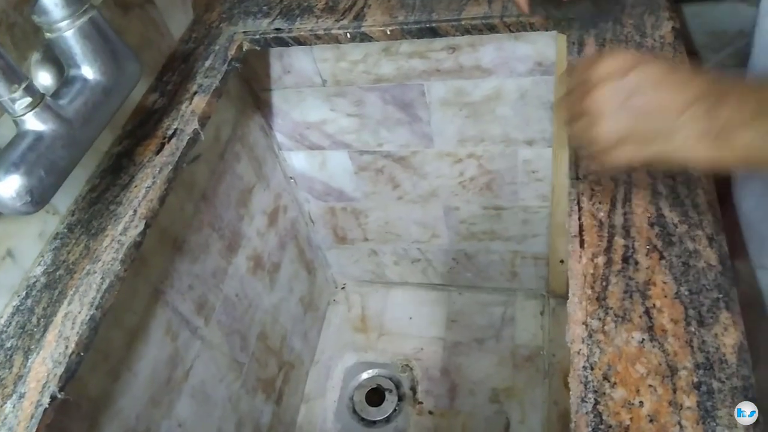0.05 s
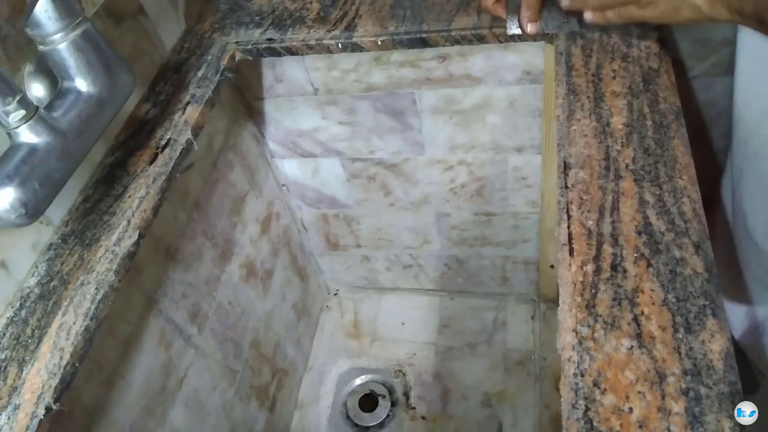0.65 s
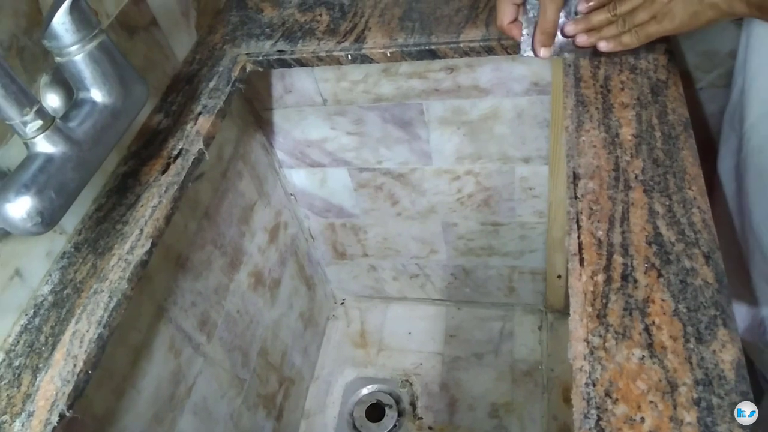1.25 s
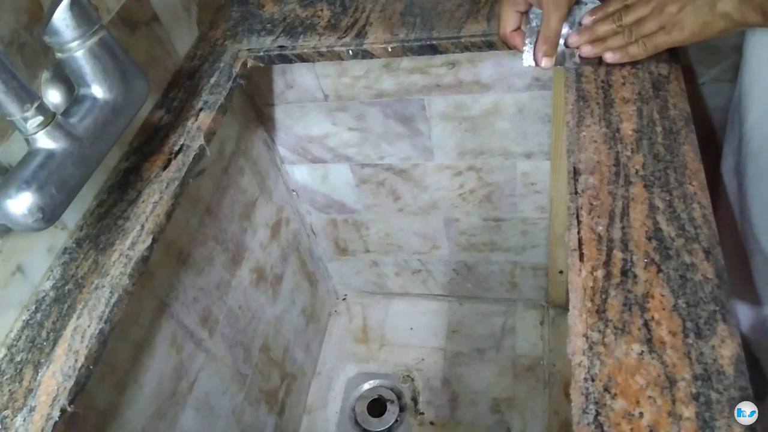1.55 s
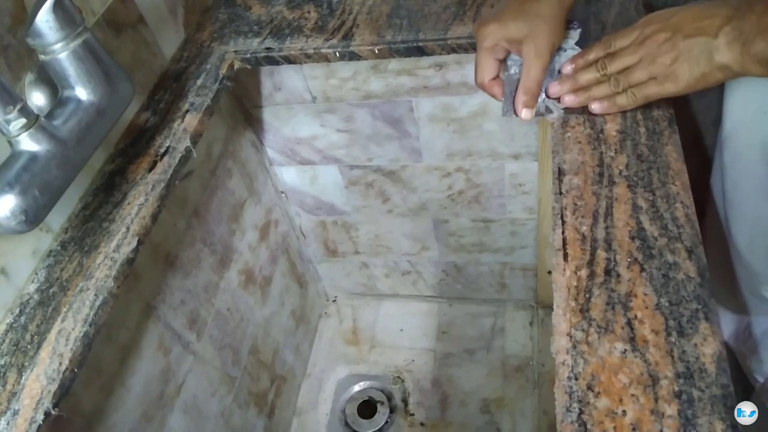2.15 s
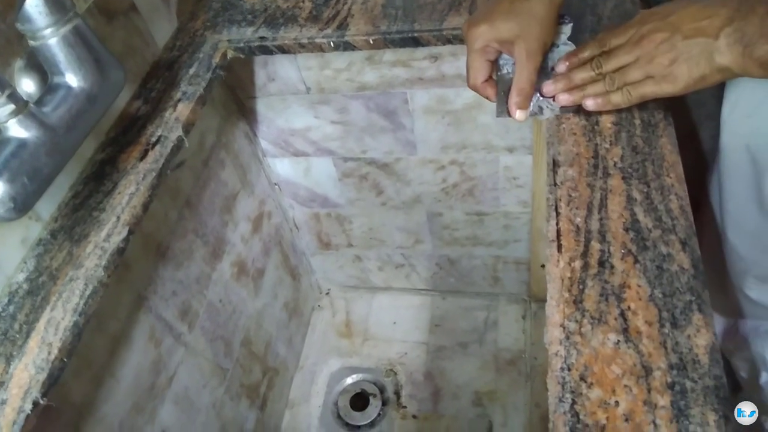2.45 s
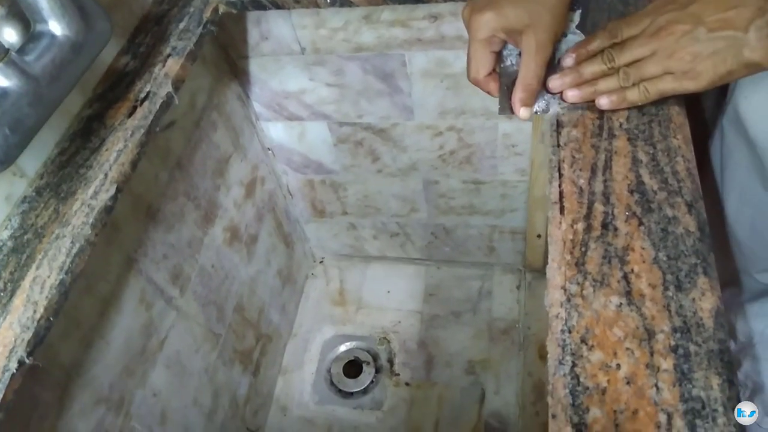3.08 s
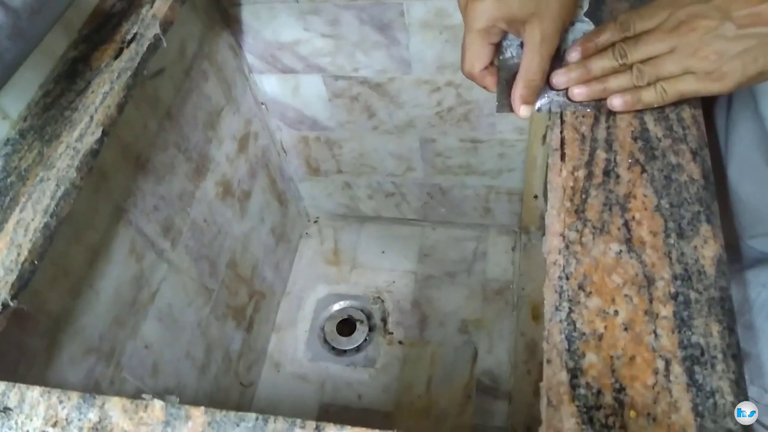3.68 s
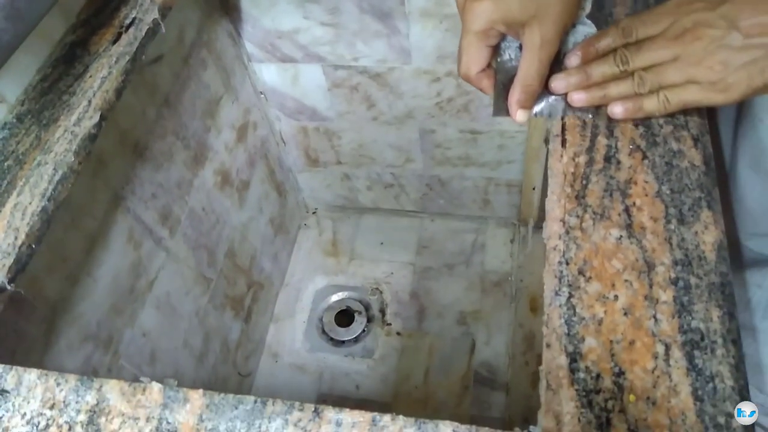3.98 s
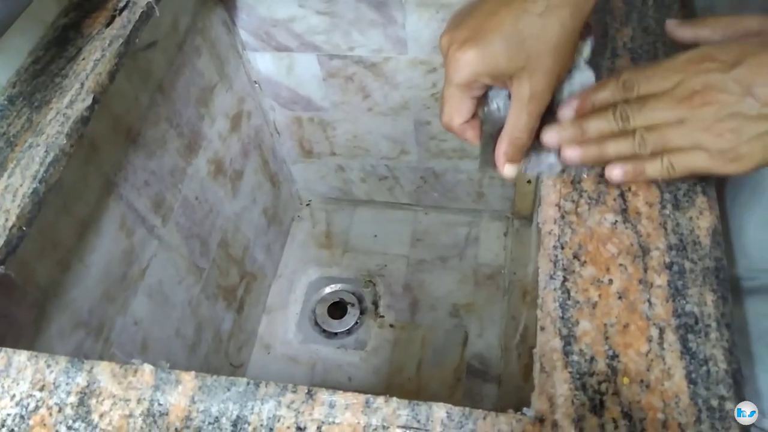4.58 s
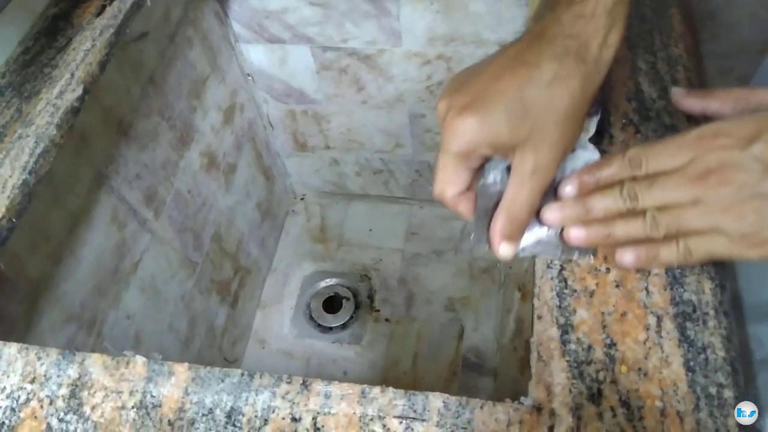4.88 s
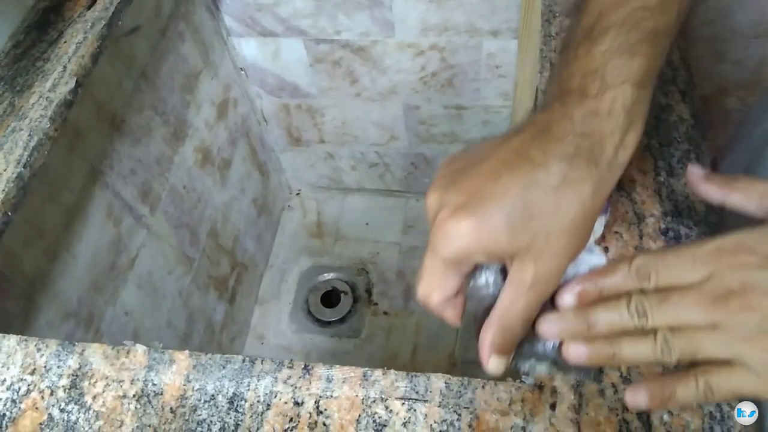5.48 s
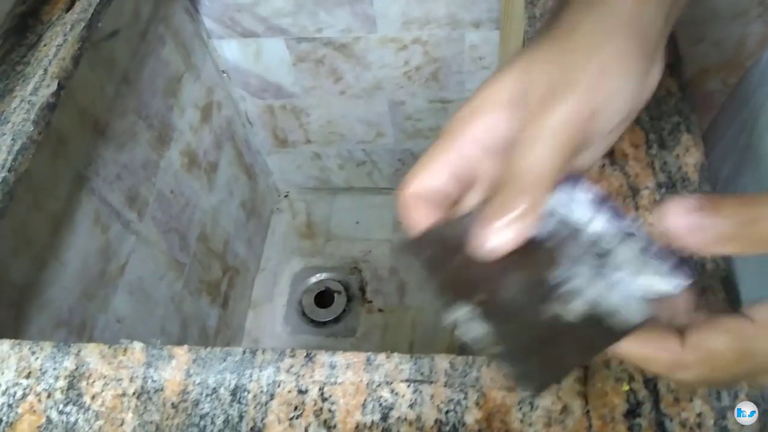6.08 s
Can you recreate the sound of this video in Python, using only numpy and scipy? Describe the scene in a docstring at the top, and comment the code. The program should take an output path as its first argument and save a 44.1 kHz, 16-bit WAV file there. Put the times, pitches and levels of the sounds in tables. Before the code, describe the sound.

Short, uneven scrapes of a metal blade cutting old sealant from stone, with crisp cracks and steely clicks in a small kitchen.

```python
"""A steel scraper cuts old sealant from the stone rim of a tiled sink, in short strokes.
Its edge sticks and slips, shaking the blade, catches on the stone and snaps off brittle flakes.
One microphone in the small kitchen hears this directly and off the tiles, with hands bumping the counter.
Behind it an appliance drones; far off outside, a bird gives a few falling whistles."""
import sys
import numpy as np
from scipy import signal
from scipy.fft import rfft, irfft, next_fast_len
from scipy.io import wavfile
from scipy.ndimage import uniform_filter1d, map_coordinates

SR = 44100
rng = np.random.default_rng(int(sys.argv[2]) if len(sys.argv) > 2 else 0)


def transcribe(signal):
    """Save signal, clipped to [-1, 1], as a 16-bit WAV file at the path in sys.argv[1]."""
    frames = np.atleast_2d(signal).T
    limited = np.clip(frames, -1, 1)
    pcm = np.round(limited * 32767).astype(np.int16)
    wavfile.write(sys.argv[1], SR, pcm)


N = 279461

# the appliance in the background, its hum's fundamental and its drone: time_s, level_db
HUM_LEVEL = [(0.0, -79), (0.97, -79), (1.04, -59), (1.84, -72), (1.91, -60), (2.44, -75), (2.5, -55.5),
             (2.79, -86), (2.91, -59), (3.25, -101), (3.63, -69), (4.9, -67.5), (5.05, -53), (5.31, -92),
             (5.49, -67), (6.34, -77)]
DRONE_LEVELS = [(0.0, -64), (0.02, -62), (0.48, -59.5), (0.63, -72), (1.02, -57), (1.06, -65.5),
                (1.75, -57), (1.89, -63), (2.33, -56.5), (2.49, -76), (2.74, -54), (2.89, -70), (3.05, -55),
                (3.21, -64), (3.72, -58.5), (3.76, -61.5), (4.16, -57.5), (4.25, -76), (4.71, -54.5),
                (4.99, -73), (5.15, -57), (6.34, -58)]
# spectra of room air, drone, catches, flakes, scouring and grit: frequency_hz, relative_db
AIR_SPECTRUM = [(20, -24), (60, -7.5), (140, -2.5), (300, -6), (450, -6.5), (700, -10), (1000, -10.5),
                (2000, -16.5), (3000, -16), (5000, -21.5), (8000, -28), (12000, -33.5), (16000, -39)]
DRONE_SPECTRUM = [(170, -34), (220, -6.5), (270, -7.5), (315, 2), (360, -4.5), (420, -22), (600, -42),
                  (1200, -120)]
CATCH_SPECTRUM = [(150, -65), (380, 7), (550, 2.5), (800, -19), (1200, 6.5), (1650, 3), (3000, 13),
                  (4600, -0.5), (5600, 6), (9000, -8.5), (16000, -16.5)]
FLAKE_SPECTRUM = [(300, -55), (900, -45), (2000, -37), (4000, -1.5), (5500, 9.5), (7500, 6), (10000, -4),
                  (16000, -3.5)]
SCOUR_SPECTRUM = [(1000, -74), (1400, -16.5), (1800, -4), (2600, 1), (3400, -2), (4300, -5), (5200, -17),
                  (7000, -99)]
GRIT_SPECTRUM = [(2500, -51), (4300, -10), (5400, 1.5), (6500, -1.5), (7400, -6.5), (8500, -7), (9800, -15),
                 (11500, -14), (13500, -12), (16000, -18.5)]
# how long the tiled kitchen rings: frequency_hz, t60_s
KITCHEN_DECAY = [(150, 0.55), (600, 0.35), (3000, 0.27), (7000, 0.31), (15000, 0.28)]
# the far bird: start_s, level_db, first_pitch_hz, note_spacing_s
BIRD_CALLS = [(.005, -52.5, 5330, 0.029), (3.71, -56, 5240, 0.052), (5.877, -56, 5516, 0.053)]
# hands on the counter: start_s, level_db, pitch_hz, length_s
HAND_BUMPS = [(.38, -42.5, 167, 0.026), (.43, -46, 210, 0.029), (.66, -50.5, 147, 0.02),
              (1.52, -46, 224, 0.031), (1.75, -48, 226, 0.018), (2.85, -46, 151, 0.096),
              (3.09, -48.5, 250, 0.031), (3.565, -50, 152.5, 0.075), (3.655, -45, 238, 0.042),
              (3.95, -49, 155, 0.07), (4.93, -42.5, 148.7, 0.12), (5.45, -44, 147, 0.13),
              (5.95, -44.5, 149.5, 0.063), (6.06, -48, 228, 0.087)]

# modes of the blade, free and then pressed to the stone (low, middle, high): pitch_hz, width_hz, gain_db
FREE_MODES = [(1005, 38, 7.5), (1168, 35, -5.5), (1364, 88, -7.5), (2055, 73, -1), (2400, 53, -4.5),
              (3066, 21, 9), (3268, 69, -2), (3950, 41, 3.5), (5420, 450, -7), (5870, 66, -3),
              (6570, 480, -18), (8060, 160, -13), (8840, 110, -10)]
FLEX_MODES = [(426, 19, -15), (530.5, 35, -5.5), (615, 48, -0.5), (671, 36, -4.5), (720, 15, -7.5)]
CHATTER_MODES = [(867, 14, -1), (1003, 116, -5.5), (1149, 52, 2), (1216, 24.3, 7), (1344.6, 48, 2),
                 (1482, 46, -1.5), (1794, 73, -5.5)]
RASP_MODES = [(1946, 17, -5.5), (2340, 186, -1.5), (2475, 410, -0.5), (2943, 114, 2.5), (3213, 174, 0),
              (3630, 45, 0)]
# light touches of the blade: start_s, level_db, length_s, favoured_pitch_hz
BLADE_TOUCHES = [(0.143, -58.5, 0.2, 980), (0.325, -63.5, 0.085, 4270), (0.386, -50, 0.016, 1390),
                 (0.447, -46, 0.03, 2120), (0.777, -59.5, 0.079, 1380), (0.943, -57.5, 0.067, 5300),
                 (1.079, -42, 0.023, 1200), (1.281, -55, 0.038, 3920), (1.372, -29, 0.011, 3300),
                 (1.944, -48, 0.035, 2070), (2.345, -52, 0.033, 3020), (2.741, -49, 0.067, 3080),
                 (2.831, -46.5, 0.083, 1520), (3.91, -61, 0.18, 4400), (4.023, -44, 0.14, 3140),
                 (4.149, -37, 0.023, 3020), (4.683, -40, 0.011, 1250), (4.684, -31, 0.012, 3040),
                 (5.286, -52.5, 0.054, 3260), (5.785, -68, 0.025, 990), (6.205, -51.5, 0.031, 5300)]
# tones held by friction: start_s, level_db, rise_s, hold_s, release_s, pitch_hz
FRICTION_TONES = [(0.773, -64, .015, 0.074, 0.06, 1418), (1.085, -44.5, 0.04, 0.078, 0.11, 535),
                  (2.118, -52, .012, 0.04, 0.031, 1210), (4.146, -41, 0.019, .006, 0.05, 609),
                  (4.283, -49, 0.027, .005, 0.032, 608), (4.422, -43.5, 0.018, 0.12, .06, 610),
                  (4.542, -35, 0.034, .006, 0.17, 611.5), (4.674, -31, .022, 0.016, 0.079, 610),
                  (4.782, -49, 0.038, 0.097, 0.26, 607), (5.285, -57, 0.0099, 0.0037, 0.071, 604)]
# flakes breaking off: start_s, level_db
FLAKE_SNAPS = [(1.1346, -27), (2.0076, -29), (2.0125, -28.5), (2.065, -25.5), (2.12, -23), (2.1563, -24),
               (2.1717, -29.5), (2.7057, -33.5), (2.9218, -34), (3.3009, -43), (4.3183, -28.5),
               (4.4032, -28), (4.5021, -22), (4.767, -39), (4.7754, -24.5), (4.9162, -26), (5.3204, -27.5),
               (5.4952, -24), (5.4984, -23), (5.6203, -21.5), (5.7103, -33)]
# the edge catching on the stone: start_s, level_db, tilt_db_per_decade
EDGE_CATCHES = [(0.4429, -33, -10.5), (1.3716, -23, -3), (1.715, -35, 5), (1.943, -40, -19),
                (2.3453, -38.5, 16), (2.4491, -25, 17), (2.8233, -32, -1), (3.6153, -32, 12),
                (4.15, -30, 1), (4.5662, -24, 3), (4.6831, -16.5, -0.5), (5.0659, -25.5, 2),
                (5.1218, -24, 6)]
# strokes along the rim; pushes bite deep and shake the blade, light drags mostly crumble grit:
# start_s, rise_s, hold_s, release_s, rasp_db, flex_db, chatter_db, grit_db, flatness (0 steep, 1 flat)
# flex, chatter and grit are relative to the rasp
SCRAPER_STROKES = [ (.925, 0.021, 0.013, 0.21, -60.5, -2.5, 1.5, -12, 0.32),
                   (1.065, 0.081, 0.0082, 0.11, -35, -9.5, -2.5, -8.5, 0.45),
                   (1.368, .006, 0.093, 0.13, -41, -12.5, -1, -5.5, 0.84),
                   (1.51, .025, 0.097, .04, -71.5, 11.5, -8, -8, 0.75),
                   (1.659, 0.044, 0.08, 0.14, -46, -4, 2, -5.5, 0.93),
                   (1.835, 0.026, 0.062, .06, -69, 15, -3, 12.5, .6),
                   (1.927, 0.018, 0.046, 0.099, -48.5, 2.5, 0.5, -0.5, 0.81),
                   (2.0, .012, 0.063, 0.081, -50, -12, -7, -4, 0.99),
                   (2.105, 0.025, 0.1, 0.12, -49, -22, -21, 6, 0.84),
                   (2.225, 0.013, 0.024, .08, -66, 6, 8.5, -3, .6),
                   (2.335, 0.018, 0.12, .08, -60, -10, -4, 0, 0.36),
                   (2.442, .012, 0.015, .18, -50, -1.5, -0.5, -8, 0.74),
                   (2.625, 0.13, 0.085, .12, -65, -9.5, -5.5, 13.5, 0.45),
                   (2.74, 0.029, .04, .06, -64, 6, 3, 8, 0.47),
                   (2.816, .035, 0.028, 0.21, -41, -7.5, -1.5, -7.5, 0.53),
                   (2.91, .02, 0.02, 0.21, -46, -5, -11, -11, 0.78),
                   (3.095, 0.17, .08, 0.16, -42.5, -36, -15.5, -4.5, 0.65),
                   (3.24, 0.033, 0.045, 0.54, -49, -10, -9.5, 0, 1),
                   (3.521, 0.044, 0.091, 0.17, -53, -10, -26, -1, 0.6),
                   (3.69, 0.14, 0.18, 0.5, -78, 11, -18, 7, 1),
                   (3.6, 0.029, 0.011, 0.082, -49, -6, -7, -23, 0.43),
                   (3.981, .07, 0.12, 0.091, -56, 2, -13, 3, 0.36),
                   (4.139, 0.046, 0.04, 0.11, -44.5, -3, -8, -6.5, 0.57),
                   (4.2, 0.036, 0.025, 0.2, -41.5, -10, -8, -5, 0.81),
                   (4.305, .022, .01, 0.18, -46.5, -13, -26, -0.5, 0.42),
                   (4.391, 0.033, 0.024, 0.11, -44, -9, -22, -6.5, .6),
                   (4.434, 0.032, 0.098, 0.22, -42, -0.5, 0.5, -8.5, 0.64),
                   (4.67, 0.0075, 0.037, 0.055, -41.5, -1, 3, -9, .5),
                   (4.71, .025, 0.076, .24, -38, -12.5, -5.5, 1.5, 0.74),
                   (4.82, 0.025, 0.13, .28, -41.5, -20.5, -15, -1, 0.98),
                   (5.039, 0.039, 0.067, 0.093, -40.5, -17.5, -7, -9, 0.45),
                   (5.288, 0.11, 0.096, 0.4, -41, -34.5, -25.5, 0, 0.54),
                   (5.47, 0.024, .17, 0.047, -48, -36, -12, -14, 1),
                   (5.7, 0.035, 0.13, 0.052, -51, -20, -21, 4, 0.45), ]
# where a shifting grip colours the sound most: frequency_hz, depth_factor
GRIP_DEPTH = [(700, 0.19), (1500, 1), (5000, 1.0), (12000, 0.68)]


def amp(db):
    """Decibels to gain."""
    return 10 ** (np.asarray(db) / 20)


def unit(x):
    """Scale to rms 1."""
    return x / np.sqrt(np.mean(x ** 2) + 1e-20)


def along(points, hz):
    """Read (frequency_hz, value) points along a log frequency axis."""
    frequencies, values = np.transpose(points)
    return np.interp(np.log(hz + 1), np.log(frequencies + 1), values)


def curve(points):
    """Join (time_s, value) points, one value a sample."""
    return np.interp(np.arange(N) / SR, *np.transpose(points))


def wobble(rate, length=N):
    """A smooth random curve, rate knots a second."""
    knots = rng.standard_normal(int(length * rate / SR) + 4)
    return map_coordinates(knots, [np.arange(length) * rate / SR])


def filtered(x, response):
    """Pass x through a complex response of frequency."""
    size = next_fast_len(len(x) + SR // 2)
    return irfft(rfft(x, size) * response(np.fft.rfftfreq(size, 1 / SR)), size)[:len(x)]


def coloured(x, spectrum):
    """x shaped by a smooth spectrum, at rms 1."""
    return unit(filtered(x, lambda hz: amp(along(spectrum, hz))))


def resonate(x, modes):
    """x rung through modes of alternating sign, at rms 1; little sounds far outside their range."""
    def response(f):
        return sum((-1) ** k * amp(db) * 1j * f * width / (hz * hz - f * f + 1j * f * width)
                   for k, (hz, width, db) in enumerate(modes))
    edges_hz = [modes[0][0] * .85, modes[-1][0] * 1.18]
    band = signal.butter(2, edges_hz, "band", fs=SR, output="sos")
    return unit(signal.sosfilt(band, filtered(x, response)))


def add(track, start_s, sound):
    """Mix a sound into the track from start_s."""
    part = track[max(round(start_s * SR), 0):][:len(sound)]
    part += sound[:len(part)]


def burst(t60_s, length=SR // 4):
    """Noise that dies away, 60 dB in t60_s."""
    t = np.arange(length) / SR
    return rng.standard_normal(length) * amp(-60 * t / t60_s)


def room_air():
    """The still air of the kitchen: a faint, steady rush."""
    return amp(-62.5) * coloured(rng.standard_normal(N), AIR_SPECTRUM)


def appliance():
    """In the background, an appliance gives a wavering hum, its octave and a low, noisy drone."""
    phase = 2 * np.pi * np.cumsum(74 * (1 + 0.0167 * wobble(6.6))) / SR
    hum = amp(curve(HUM_LEVEL) + 1.5 + 2.1 * wobble(10)) * np.sin(phase)
    octave = amp(-67 + 3.3 * wobble(4.8)) * np.sin(2 * phase)
    drone_gain = amp(curve(DRONE_LEVELS) + 2.0 + wobble(14))
    return hum + octave + drone_gain * coloured(rng.standard_normal(N), DRONE_SPECTRUM)


def far_bird():
    """Far off, buzzy sliding notes, each lower and softer than the last, smeared by the walls outside."""
    step_oct, widening, sag_oct_per_s, fade_db = .16, 1.33, 1.59, 3
    out, t = np.zeros(N), np.arange(SR // 2) / SR
    envelope = (1 - np.exp(-(t / 0.0076) ** 2)) * np.exp(-(t / 0.072) ** 2)
    for start, db, first_hz, spacing in BIRD_CALLS:
        for k in range(5):
            fall_oct = step_oct * k ** widening + sag_oct_per_s * t
            pitch_hz = first_hz * 2 ** -fall_oct * (1 + .03 * wobble(500, len(t)))
            note = envelope * np.sin(2 * np.pi * np.cumsum(pitch_hz) / SR)
            walls = burst(t60_s=.55, length=len(t))
            distant = signal.fftconvolve(note, walls / np.linalg.norm(walls))
            add(out, start + k * spacing, amp(db + 3.5 - k * fade_db) * distant)
    return out


def kitchen(x, wet_db):
    """At the microphone: direct sound plus the tiled room's tail, which changes as the source moves."""
    out, hop = np.zeros(N), SR // 3
    for centre in np.arange(0, N + hop, hop):
        hz, t, noise = signal.stft(rng.standard_normal(SR // 2), SR, nperseg=256)
        decay = amp(-60 * t / along(KITCHEN_DECAY, hz)[:, None])
        tail = signal.istft(noise * decay, SR, nperseg=256)[1]
        span = np.arange(max(centre - hop, 0), min(centre + hop, N))
        crossfade = np.cos(np.pi / 2 * (span - centre) / hop)
        add(out, span[0] / SR, signal.fftconvolve(x[span] * crossfade, tail / np.linalg.norm(tail)))
    return (x + amp(wet_db) * out) / np.hypot(1, amp(wet_db))


def hand_bumps():
    """Soft hands on the counter give dull, uneven thuds that swell and fade, sagging in pitch."""
    out = np.zeros(N)
    for start, db, hz, length in HAND_BUMPS:
        progress = np.linspace(0, 1, round(length * SR))
        pitch_hz = hz * (1 - 0.12 * (progress - .5))
        phase = 2 * np.pi * np.cumsum(pitch_hz) / SR + 0.43 * wobble(64, len(progress))
        envelope = amp(db + 1.4 * wobble(62, len(progress))) * np.sin(np.pi * progress)
        add(out, start, envelope * np.sin(phase))
    return out


def blade_touches():
    """The barely loaded blade rings in its own modes; the contact point favours some of them."""
    out, t = np.zeros(N), np.arange(SR // 3) / SR
    for start, db, length, favoured_hz in BLADE_TOUCHES:
        rub = rng.standard_normal(len(t)) * amp(-6 * t / length) * (t < length)
        modes = [(hz, width, gain_db - 16 * abs(np.log2(hz / favoured_hz)))
                 for hz, width, gain_db in FREE_MODES]
        add(out, start, amp(db - 4) * np.sqrt(length / t[-1]) * resonate(rub, modes))
    return out


def push(t, rise, hold, release):
    """Force of one push: the edge lands and grips, slides with a sagging force and is eased off."""
    contact = np.clip(3.4 * t / rise, 0, 1)  # full contact comes early in the rise
    grip_db = 15 * np.clip(1 - t / rise, 0, 1) ** 2
    sag_db = 34 * np.clip(t - rise, 0, hold)
    ease_db = 24.5 * np.maximum(t - rise - hold, 0) / release
    return contact * amp(-grip_db - sag_db - ease_db)


def blade_singing():
    """Friction keeps a low mode of the blade going as an almost steady tone."""
    out, t = np.zeros(N), np.arange(SR) / SR
    for start, db, rise, hold, release, hz in FRICTION_TONES:
        phase = 2 * np.pi * hz * t + .5 * wobble(50, len(t))
        envelope = amp(db + 1.4 * wobble(56, len(t))) * push(t, rise, hold, release)
        add(out, start, envelope * np.sqrt(2) * np.sin(phase))
    return out


def flake_snaps():
    """Brittle flakes of sealant break with a very short, bright crack."""
    out = np.zeros(N)
    for start, db in FLAKE_SNAPS:
        crack = coloured(burst(t60_s=0.0068), FLAKE_SPECTRUM)
        add(out, start, amp(db + 5) * crack / np.abs(crack).max())
    return out


def edge_catches():
    """The edge jolts against the stone: a hard clack and a steely ping."""
    out = np.zeros(N)
    for start, db, tilt in EDGE_CATCHES:
        spectrum = [(hz, level + tilt * np.log10(hz / 2500)) for hz, level in CATCH_SPECTRUM]
        clack = coloured(burst(t60_s=.028), spectrum)
        ping = resonate(burst(t60_s=0.0099), FREE_MODES)
        add(out, start, amp(db + 1) * clack / np.abs(clack).max())
        add(out, start, amp(db - 14) * ping / np.abs(ping).max())
    return out


def shifting_grip(x, depth_db, width_hz, life_s):
    """The grip and contact point shift, so narrow resonances come and go."""
    hz, t, bands = signal.stft(x, SR, nperseg=1024, noverlap=768)
    grid = np.meshgrid(hz / width_hz, t / life_s, indexing="ij")
    drift = map_coordinates(rng.standard_normal((512, 256)), grid, mode="wrap")
    gain = amp(depth_db * along(GRIP_DEPTH, hz)[:, None] * np.clip(drift, -2, 2))
    gain /= np.sqrt(np.mean(gain ** 2, axis=1, keepdims=True))
    return signal.istft(bands * gain, SR, nperseg=1024, noverlap=768)[1][:N]


def slips(per_s, spread_db):
    """Tiny slips at random moments: many small, a few large."""
    happens = rng.random(N) < per_s / SR
    size = amp(spread_db * np.clip(rng.standard_normal(N), -2, 2))
    return unit(happens * size * rng.choice([-1, 1], N))


def stroke_drives():
    """How hard the strokes drive flexing, chatter, rasp, scouring and grit; overlaps add in power."""
    power, t = np.zeros((5, N)), np.arange(SR) / SR
    for start, rise, hold, release, db, flex_db, chatter_db, grit_db, flatness in SCRAPER_STROKES:
        force = push(t, rise, hold, release)
        steep = np.sqrt(1 - flatness) * force  # a steep edge drives the steel's resonances
        flat = np.sqrt(flatness) * force  # a flat one hisses over the stone
        drives = [amp(flex_db) * force, amp(chatter_db) * force, steep, flat, amp(grit_db) * force ** .97]
        for track, drive in zip(power, drives):
            add(track, start, (amp(db) * drive) ** 2)
    return np.sqrt(power)


def scraping():
    """On the sink's rim, slips of the edge shake the blade's modes and crumble the sealant."""
    flex, chatter, steep, flat, crumbling = stroke_drives()
    judder = amp(0.44 * wobble(45) + 1.4 * wobble(220))  # the edge grips unevenly
    coarse = slips(per_s=2200, spread_db=5.0) * judder
    fine = slips(per_s=5000, spread_db=3.0) * judder
    crumbs = slips(per_s=130, spread_db=2.5)
    blade = flex * resonate(coarse, FLEX_MODES) + chatter * resonate(coarse, CHATTER_MODES)
    rasp = steep * resonate(coarse, RASP_MODES)
    scouring = flat * coloured(fine, SCOUR_SPECTRUM)
    grit = crumbling * coloured(fine + 0.21 * crumbs, GRIT_SPECTRUM)
    return blade + rasp + scouring + grit


def scene():
    """From one spot in the kitchen, in mono: work at the sink in front, appliance and bird behind."""
    rubbing = kitchen(scraping() + blade_touches() + hand_bumps(), wet_db=-5.0)
    rubbing = shifting_grip(rubbing, depth_db=4.8, width_hz=130, life_s=.11)
    impacts = kitchen(edge_catches() + flake_snaps(), wet_db=0.5)
    return (rubbing + blade_singing() + impacts + far_bird() + appliance() + room_air())[None]


def noise_suppressor(x, depth_db, threshold_db):
    """Whatever stays near a band's own floor is turned down; the bass is mostly spared."""
    hz, _, bands = signal.stft(x, SR, nperseg=1024, noverlap=768)
    power = np.abs(uniform_filter1d(np.abs(bands) ** 2, 3, axis=1))
    floor = uniform_filter1d(np.percentile(power, 10, axis=1), 9)[:, None]
    openness = 1 / (1 + (floor * amp(threshold_db) ** 2 / (power + 1e-20)) ** 2)
    least_gain = amp(-depth_db * np.clip(hz / 500, 0, 1) ** 2)[:, None]
    gain = least_gain + (1 - least_gain) * openness
    return signal.istft(bands * gain, SR, nperseg=1024, noverlap=768)[1][:N]


def record(dry):
    """After the microphone, steady noise is suppressed and nothing above 15.9 kHz is kept."""
    clean = noise_suppressor(dry[0], depth_db=7, threshold_db=11)
    return filtered(clean, lambda hz: hz < 15900)[None]


dry = scene()
out = record(dry)
transcribe(out)
```